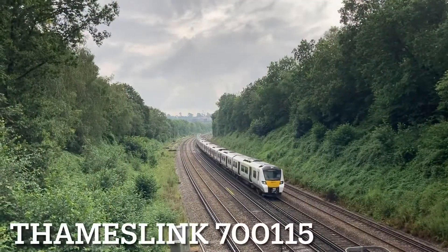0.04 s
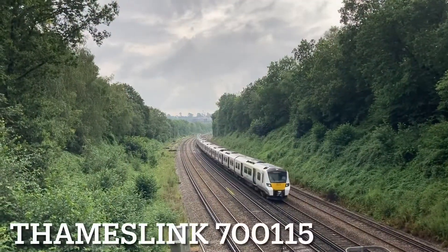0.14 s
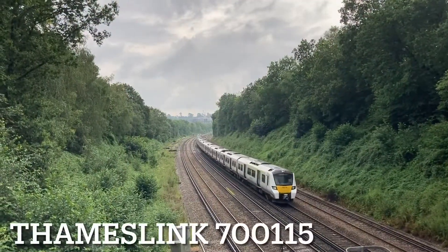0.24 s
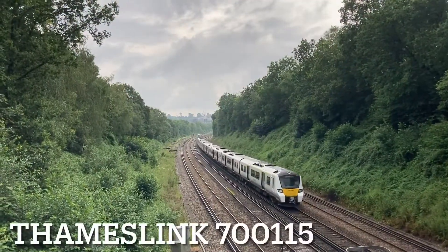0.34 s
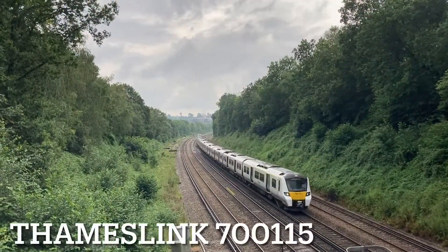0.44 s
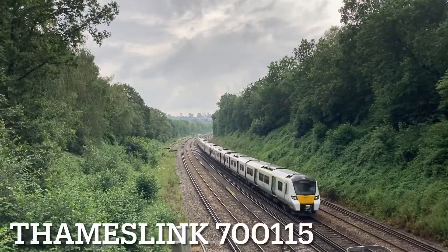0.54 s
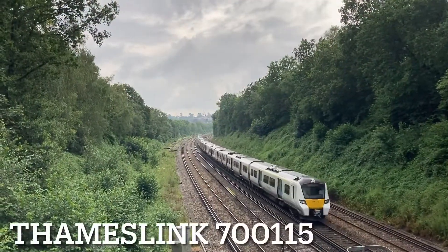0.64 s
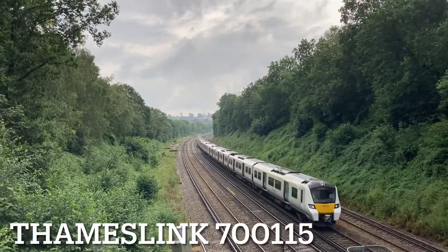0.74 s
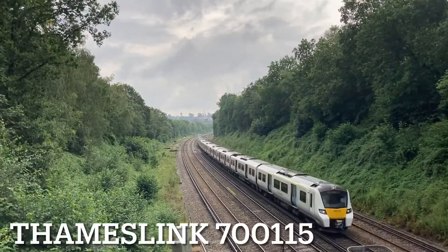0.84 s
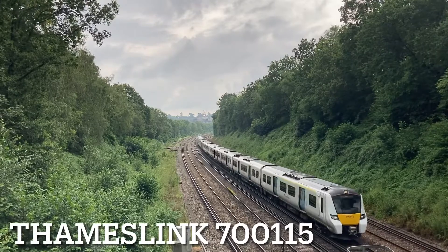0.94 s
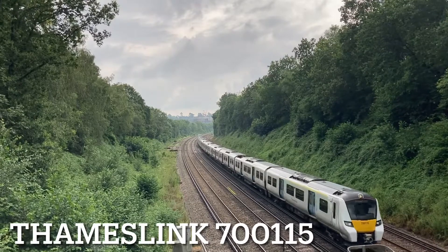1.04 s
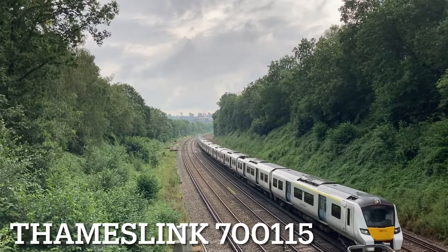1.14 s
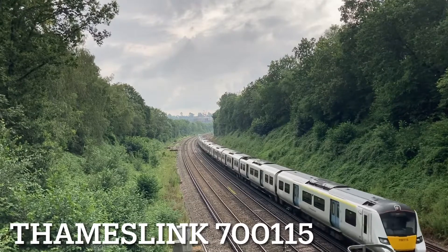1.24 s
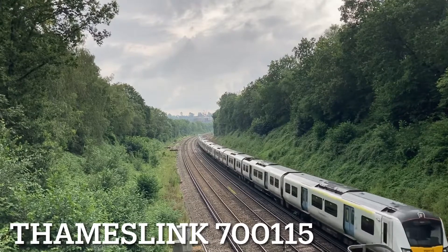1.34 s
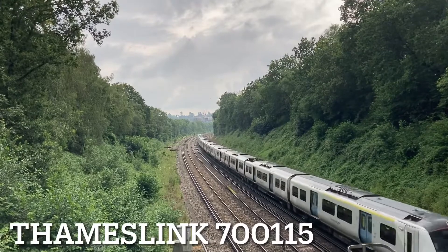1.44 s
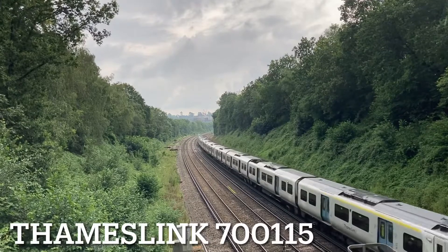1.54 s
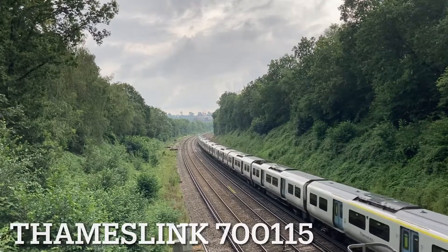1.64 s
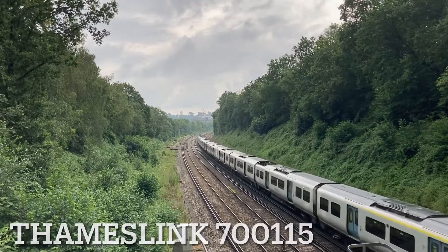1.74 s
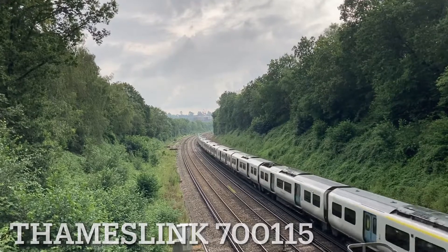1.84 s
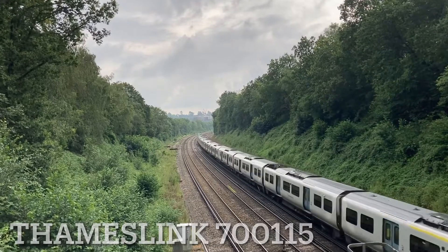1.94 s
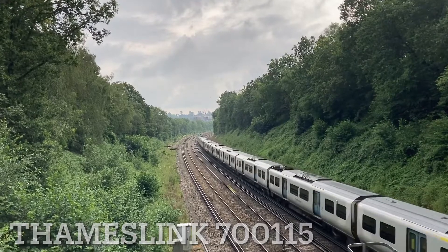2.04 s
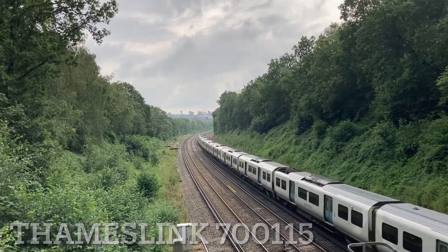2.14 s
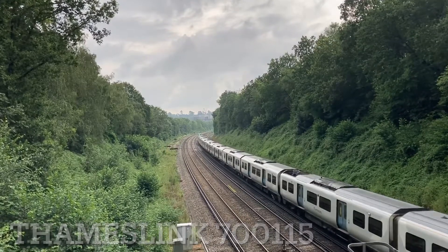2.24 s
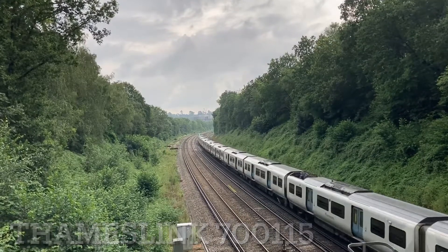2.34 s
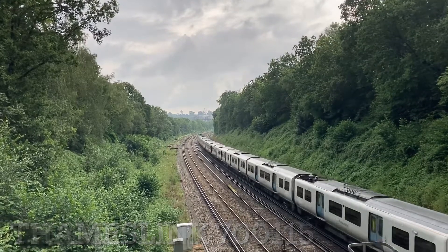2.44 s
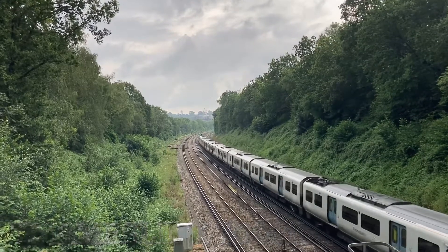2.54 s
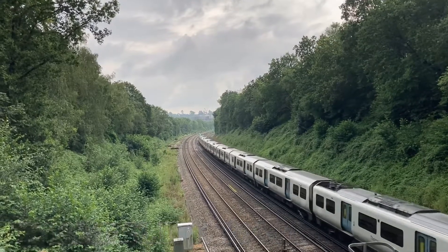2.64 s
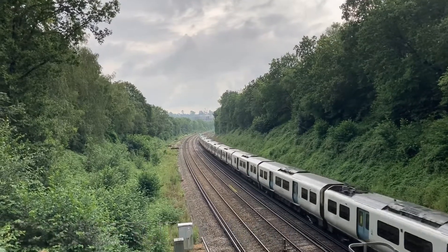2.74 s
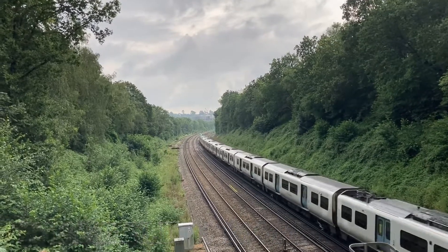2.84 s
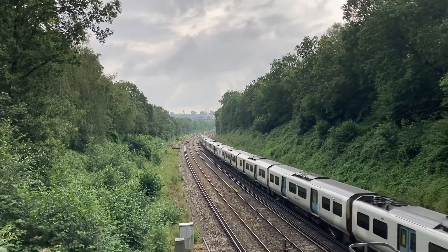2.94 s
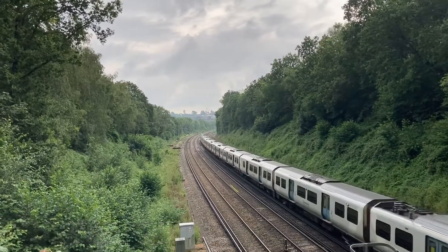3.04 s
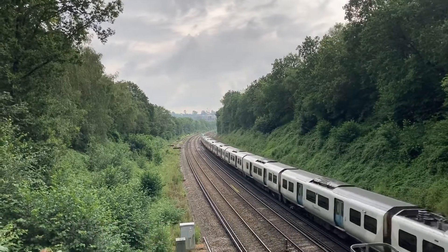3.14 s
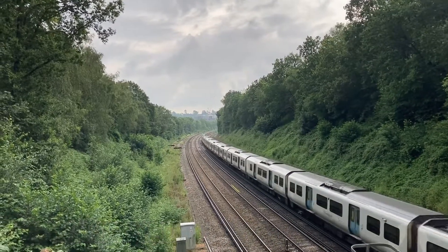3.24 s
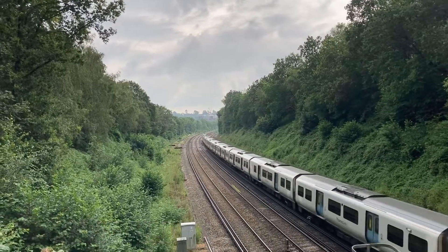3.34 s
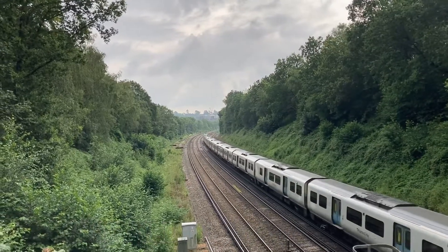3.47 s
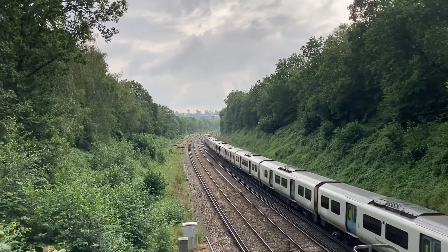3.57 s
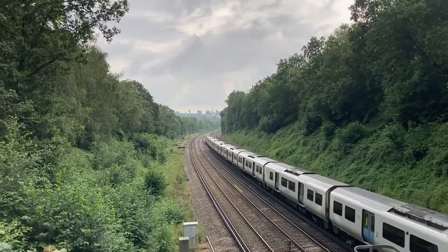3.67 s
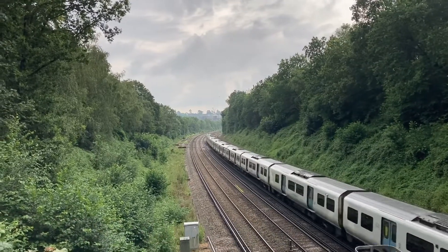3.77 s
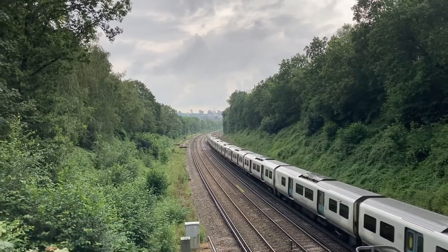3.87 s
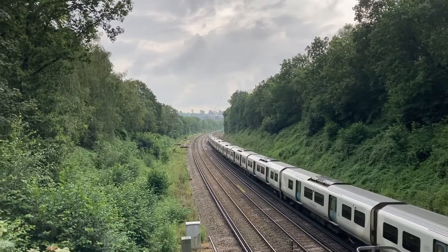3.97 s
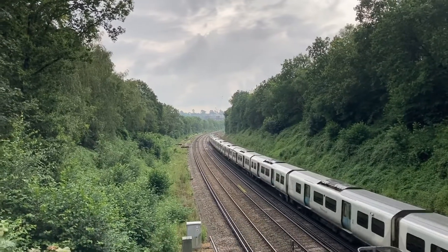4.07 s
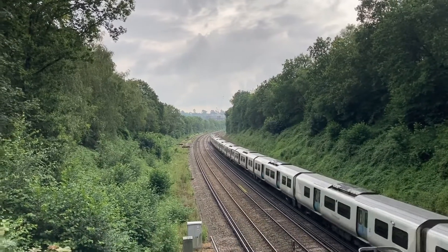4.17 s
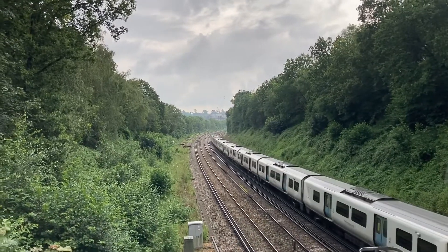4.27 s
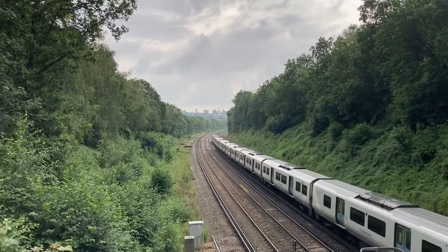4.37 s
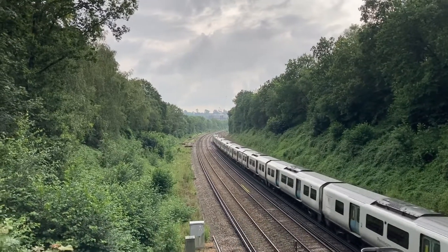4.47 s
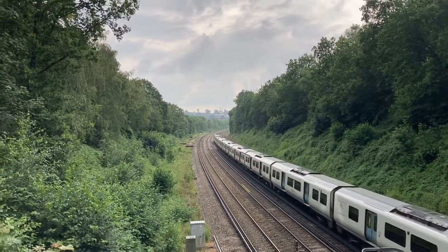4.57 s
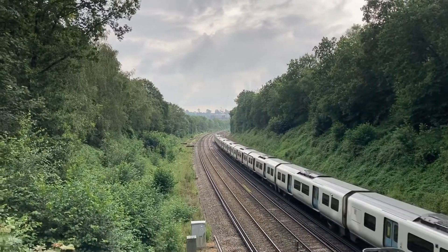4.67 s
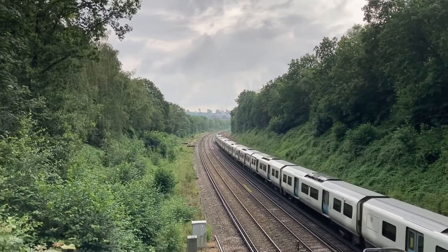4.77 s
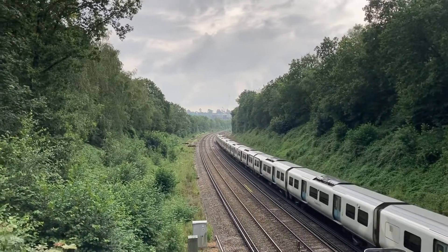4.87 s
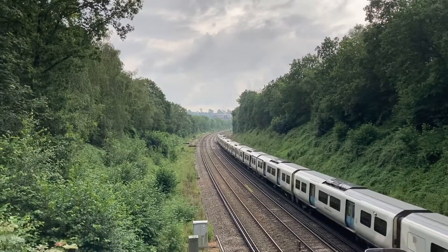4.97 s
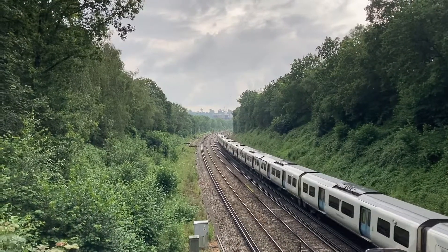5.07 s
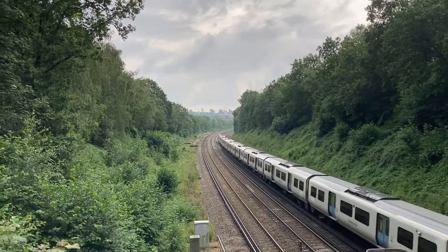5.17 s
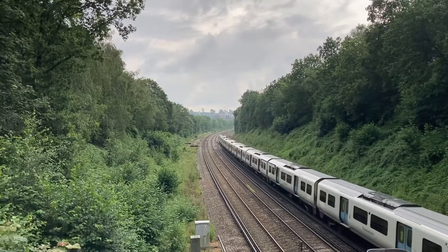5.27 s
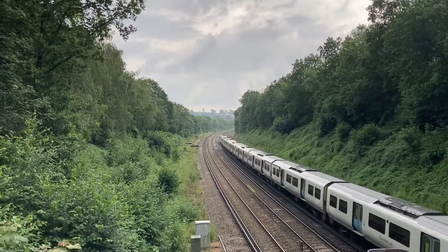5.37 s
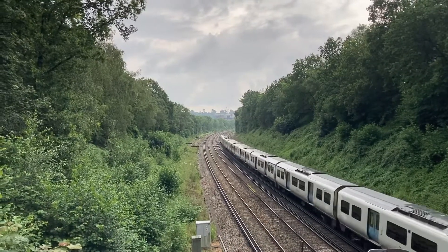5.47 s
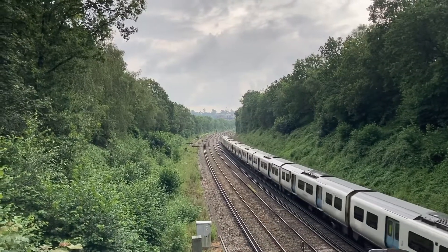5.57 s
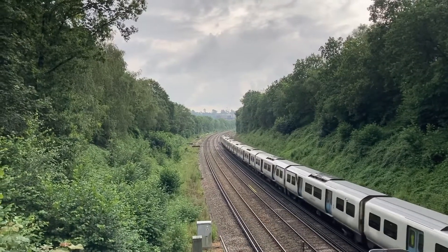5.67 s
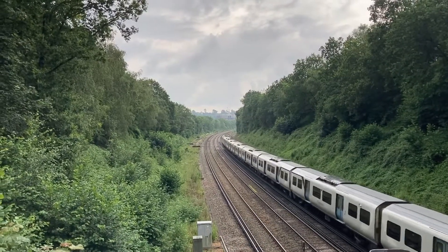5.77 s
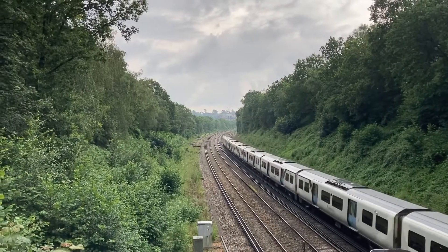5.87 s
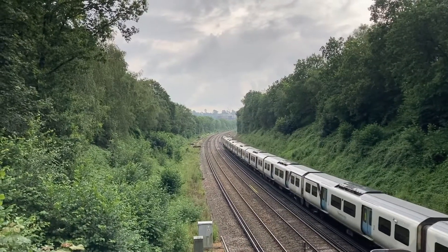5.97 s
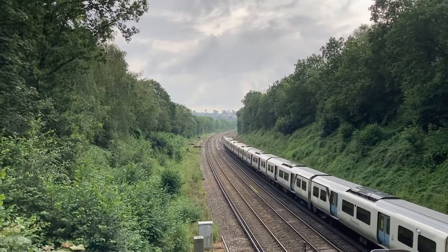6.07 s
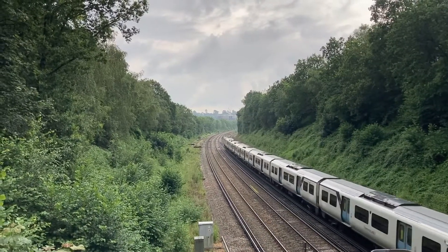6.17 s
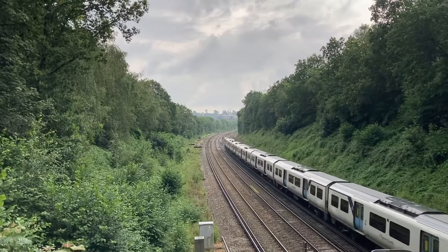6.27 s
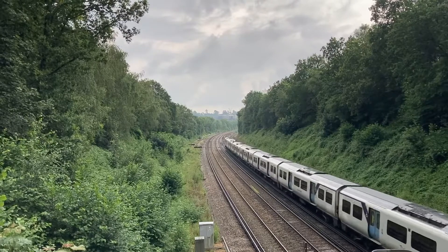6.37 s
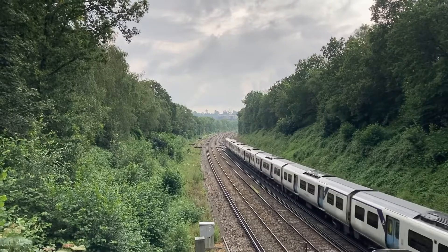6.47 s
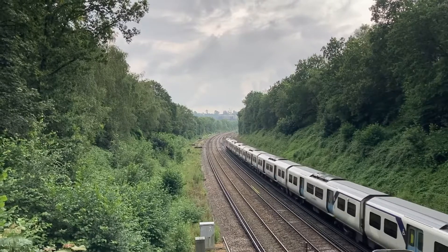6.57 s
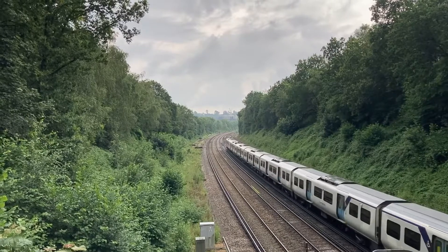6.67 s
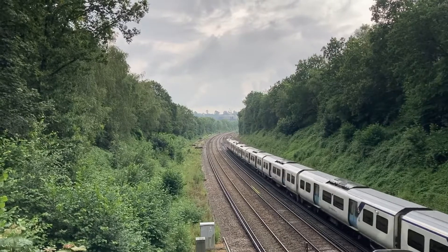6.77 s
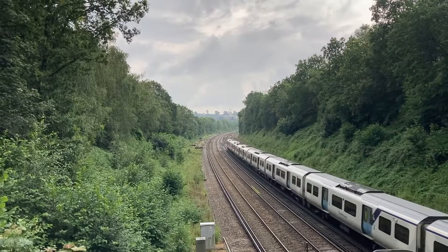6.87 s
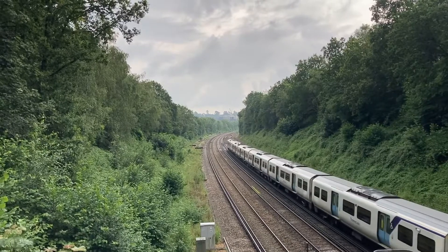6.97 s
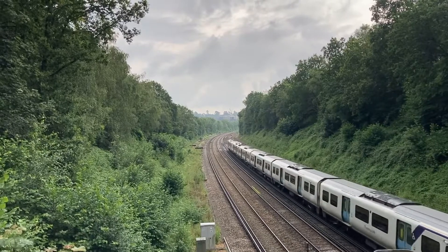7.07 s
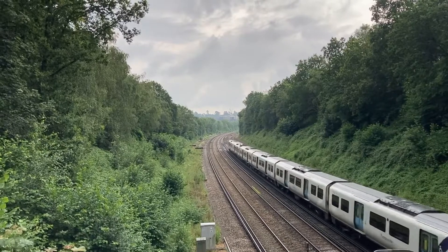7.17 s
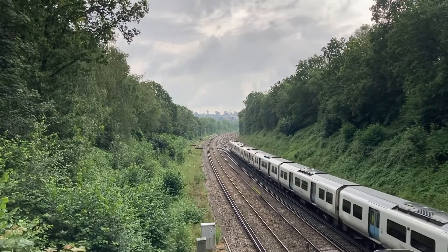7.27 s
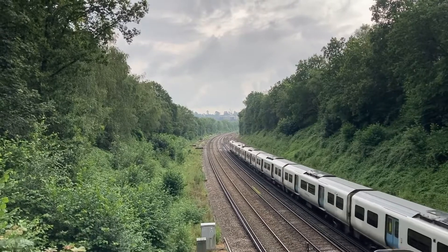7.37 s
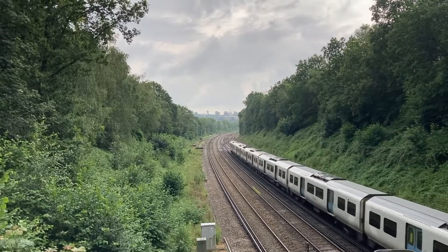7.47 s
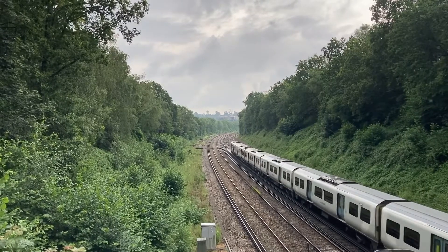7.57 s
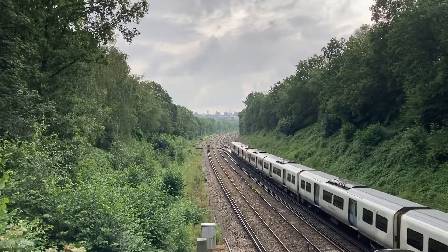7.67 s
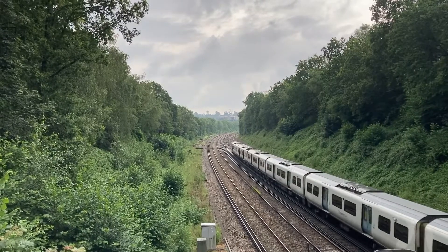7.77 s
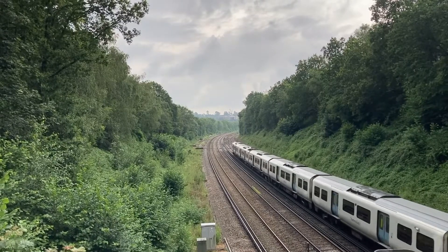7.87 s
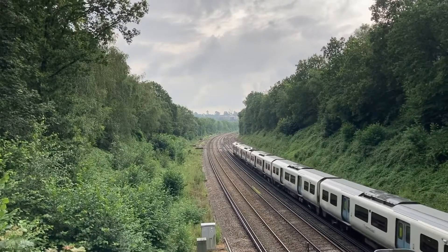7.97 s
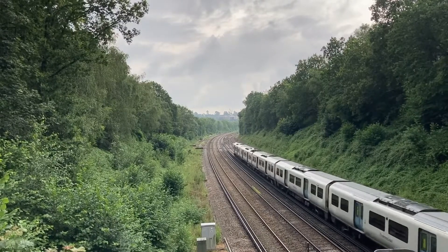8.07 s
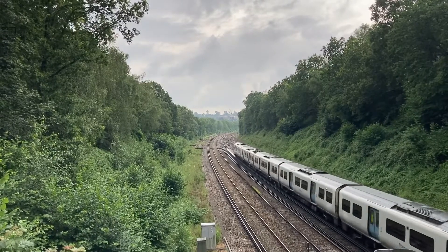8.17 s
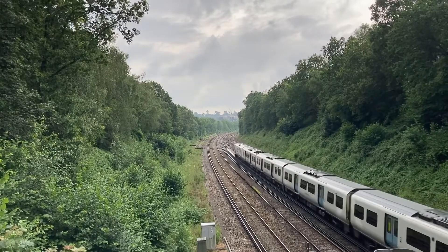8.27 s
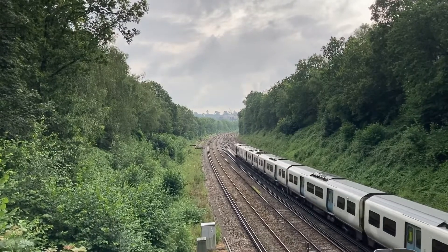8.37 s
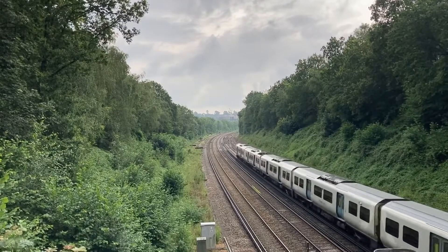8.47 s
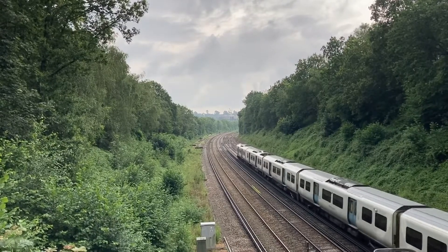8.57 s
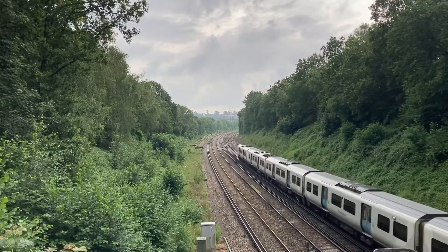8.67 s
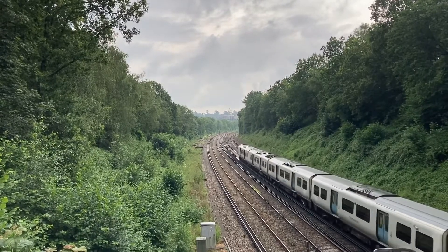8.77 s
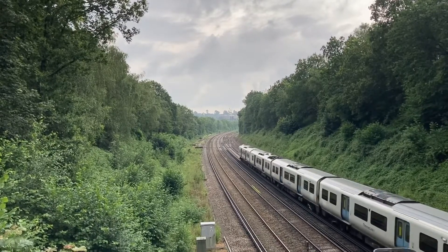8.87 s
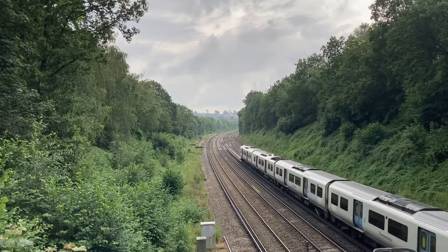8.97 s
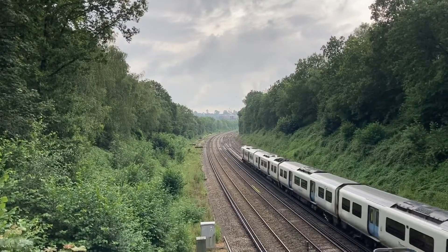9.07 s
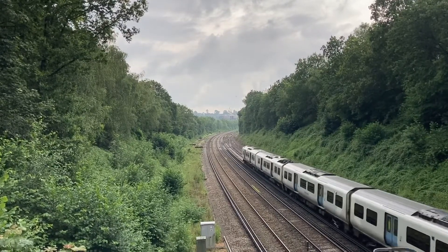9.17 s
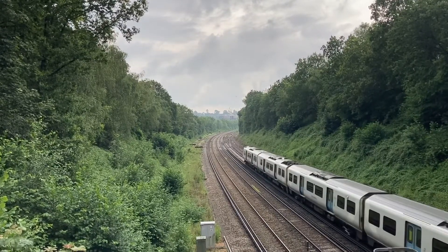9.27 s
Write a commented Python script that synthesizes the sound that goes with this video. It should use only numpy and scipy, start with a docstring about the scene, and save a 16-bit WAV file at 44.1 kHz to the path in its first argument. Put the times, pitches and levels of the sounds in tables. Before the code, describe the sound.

An electric passenger train rushes through a wooded cutting and under a bridge, wheels roaring and hissing, axles thumping in regular pairs over one rail joint.

```python
"""Wheels roar and hiss, the ground rumbles and coaches boom as an electric train runs through a cutting and
passes under the bridge that carries the microphone. Each axle thumps over the same rail joint, two to a bogie;
rails sing, a flange squeals, thin whistles, rasps and knocks come and go, a loose part clinks, something snaps.
Rolling sounds are shaped noise at two microphone ports; blows are decaying modes, squeals are stacks of sines."""
import sys
import numpy as np
from scipy import signal
from scipy.fft import rfft, irfft, next_fast_len
from scipy.io import wavfile
from scipy.ndimage import uniform_filter1d

SR = 44100
rng = np.random.default_rng(int(sys.argv[2]) if len(sys.argv) > 2 else 0)


def dump_mix(stems):
    """Bounce the given channels to the path in sys.argv[1] as a 16-bit WAV at rate SR."""
    frames = np.atleast_2d(stems).T  # one column per channel
    limited = np.clip(frames, -1, 1)  # hard clip at full scale
    pcm = np.round(limited * 32767).astype(np.int16)
    wavfile.write(sys.argv[1], SR, pcm)


N = 411012
WINDOW, HOP = 2048, 512  # samples
BINS = np.fft.rfftfreq(WINDOW, 1 / SR)  # Hz
FRAMES = np.arange(N // HOP + 5) * HOP / SR  # s
TIME = np.arange(N) / SR  # s

# phase by which the left port leads the right: (frequency [Hz], lead [rad])
PORT_LEAD = [(100, 0), (600, -.15), (800, -.45), (1100, -.45), (1500, 0), (1950, 2.1), (2700, 4.9),
             (3500, 4.6), (4300, 2.8), (5500, 3.2), (7000, 5), (8800, 6.5), (11500, 9.4), (14500, 12.6)]
# left port minus right port: (frequency [Hz], level difference [dB])
PORT_TILT = [(60, .9), (260, 1), (380, 1.6), (550, 3.4), (790, 4.7), (1140, 1.2), (1650, -1.7),
             (2300, -2.3), (3300, 1), (5000, .3), (15000, 0)]
# axles on the joint, leading and trailing by turns: (time [s], thud [dB before trim], clang [dB before trim])
AXLE_HITS = [(1.202, -14, -25.5), (1.329, -24, -26), (1.875, -12.5, -19.5), (1.99, -18.5, -24.5),
             (2.156, -16, -21), (2.252, -20, -25.5), (2.823, -17.5, -23.5), (2.925, -16.5, -25),
             (3.098, -16, -23), (3.196, -25, -28), (3.765, -13.5, -22.5), (3.867, -19, -26),
             (4.032, -18, -26), (4.129, -26, -27), (4.688, -14, -24), (4.779, -26, -33),
             (4.973, -14.5, -20.5), (5.056, -18, -26.5), (5.614, -12.5, -29), (5.71, -14, -23),
             (5.89, -18, -26.5), (5.98, -24, -22.5), (6.531, -13.5, -23.5), (6.621, -15, -23.5),
             (6.801, -17.5, -20.5), (6.895, -24, -19.5), (7.443, -14, -25), (7.533, -14.5, -23),
             (7.706, -19, -19), (7.805, -28, -21.5), (8.343, -13, -20.5), (8.435, -13.5, -21),
             (8.607, -14.5, -20), (8.697, -26, -27), (9.242, -12, -19.5)]
# ground and coach levels: (time [s], boom [dB before swells], rumble [dB before trim], drone [dB before trim])
GROUND_LEVELS = [(0, -46, -46, -43.5), (.45, -38, -45.5, -44), (.95, -41, -41, -40), (1.4, -35, -36.5, -35),
                 (2.1, -39.5, -30, -33), (3, -37, -35, -30), (4.6, -39.5, -32.5, -33),
                 (5.7, -39.5, -31.5, -33.5), (7.4, -37.5, -32, -33), (8.4, -36.5, -32, -33.5),
                 (9.32, -37.5, -33.5, -35)]


def gain_of(db):
    """Decibels to amplitude."""
    return 10 ** (np.asarray(db) / 20)


def evened(x):
    """Scales to rms 1."""
    return x / np.sqrt(np.mean(x ** 2) + 1e-20)


def read(points, hz):
    """Interpolates a frequency table linearly over log frequency."""
    f, value = np.transpose(points)
    return np.interp(np.log(hz + 1), np.log(f + 1), value)


def spectrum(points, hz):
    """A dB table that falls a further 20 dB per octave outside its ends."""
    nearest = np.clip(hz + 1, points[0][0], points[-1][0])
    octaves_out = abs(np.log2((hz + 1) / nearest))
    return read(points, hz) - 20 * octaves_out


def level(rows, order=1):
    """One dB column of a time table as a gain for every sample."""
    columns = np.transpose(rows)
    return gain_of(np.interp(TIME, columns[0], columns[order]))


def add(mix, s, sound):
    """Mixes a sound in at time s, cut at the end of the mix."""
    part = mix[round(s * SR):][:len(sound)]
    part += sound[:len(part)]


def wander(size):
    """A random rms-1 curve that changes over about size samples."""
    smooth = uniform_filter1d(rng.standard_normal(N), size)
    return evened(uniform_filter1d(smooth, size))


def patches(size):
    """A smooth random rms-1 field whose patches span size = (frames, bins)."""
    field = rng.standard_normal((len(FRAMES), len(BINS)))
    field = uniform_filter1d(field, size[0], axis=0)
    return evened(uniform_filter1d(field, size[1], axis=1))


def rings(modes, drift, flare_db):
    """Power spectrum per frame of resonances that may slide in pitch and swell as one wheel follows another."""
    power = 0
    for hz, width_hz, db in modes:
        slide = np.interp(FRAMES, TIME, wander(size=SR // 2))
        swell = np.interp(FRAMES, TIME, wander(size=SR // 5))
        off_hz = BINS - hz * (1 + drift * slide[:, None])
        peak = gain_of(db + flare_db * swell[:, None]) ** 2
        power = power + peak / (1 + (off_hz / width_hz) ** 2 * 2) ** 2
    return power


def spread_noise(spectrum_db, flutter_db, streak_db):
    """Noise at both ports, spread along the train: broad flutter, brief narrow flares, a few lingering tones."""
    # likeness of the ports: (frequency [Hz], coherence [0-1])
    coherence = [(60, .97), (250, .985), (400, .92), (550, .94), (790, .78), (1300, .78), (1750, .48),
                 (2300, .42), (3000, .62), (4000, .35), (5300, .9), (7000, .8), (11000, .9), (15000, .8)]
    linger_db = 0.93  # rms
    a, b, c, d = rng.standard_normal((4, len(FRAMES), len(BINS)))
    same = np.clip(read(coherence, BINS), 0, 1)
    left, other = a + 1j * b, c + 1j * d
    right = same * left + np.sqrt(1 - same ** 2) * other
    right = right * np.exp(-1j * read(PORT_LEAD, BINS))
    lean = gain_of(read(PORT_TILT, BINS) / 2)
    field_db = spectrum_db + flutter_db * patches(size=(5, 50))
    field_db = field_db + streak_db * patches(size=(4, 3))
    field_db = field_db + linger_db * patches(size=(120, 2))
    z = np.array([left * lean, right / lean]) * gain_of(field_db)
    _, noise = signal.istft(z.swapaxes(1, 2), nperseg=WINDOW, noverlap=WINDOW - HOP)
    return evened(noise[:, :N])


def at_ports(x):
    """A single source on the track reaches the two ports with their phase lead and level difference."""
    size = next_fast_len(N + WINDOW)  # padded against wrap-around
    hz, z = np.fft.rfftfreq(size, 1 / SR), rfft(x, size)
    lean = gain_of(read(PORT_TILT, hz) / 2)
    right = z / lean * np.exp(-1j * read(PORT_LEAD, hz))
    return irfft(np.array([z * lean, right]), size)[:, :N]


def cutting(x, t60=0.41, wet_db=-11):
    """The wooded banks scatter back a short tail of decaying noise."""
    t = np.arange(SR // 2) / SR
    taps = rng.standard_normal((2, len(t))) * gain_of(-60 * t / t60) * (t > .015)
    tail = taps[0] + 0.1 * np.array([taps[1], -taps[1]])  # nearly alike at both ports
    tail = tail / np.linalg.norm(tail[0])
    return gain_of(wet_db) * signal.fftconvolve(x[None], tail, axes=1)[:, :N]


def swells(stretches, leading, harshness):
    """Summed swell in dB as each axle crosses each stretch of track; harder-clanging wheels may weigh more."""
    coach_s = 0.913  # one coach length at the train's speed
    times, _, clang_db = np.transpose(AXLE_HITS)
    weights = gain_of(harshness * (clang_db - clang_db.mean()))
    weights[0] = leading
    # the next coach repeats the last four axles
    times = np.append(times, times[-4:] + coach_s)
    weights = np.append(weights, weights[-4:])
    since_s = FRAMES[:, None] - times
    total_db = sum(db * np.exp(-((since_s - s) / half_s) ** 2) @ weights for s, half_s, db in stretches)
    return np.interp(TIME, FRAMES, total_db)


def blow(modes, contact_s, grit, scatter, spread):
    """A rough contact swells and fades, and each mode rings on from it; rms 1 at its loudest."""
    t = np.arange(SR // 4) / SR
    push = (t / contact_s) ** 2 * np.exp(-t / contact_s)
    sound = np.zeros(len(t))
    for hz, db, t60 in modes:
        roughness = evened(uniform_filter1d(rng.standard_normal(len(t)), size=180))
        swing = signal.fftconvolve(push * (1 + grit * roughness), gain_of(-60 * t / t60))[:len(t)]
        # phases meet near the height of the blow, spread [turns] apart
        turns = hz * (1 + scatter * rng.normal()) * (t - 3 * contact_s) + spread * rng.normal()
        sound += gain_of(db) * swing / abs(swing).max() * np.sin(2 * np.pi * turns)
    return sound / np.sqrt(uniform_filter1d(sound ** 2, size=900).max())


def rolling():
    """Steel rolls on steel: the ground rumbles, sleepers drone, rails roar and sing, wheels hiss."""
    # passing coaches: (time [s], roar [dB before trim], hiss [dB before trim])
    pass_levels = [(0, -39, -43.5), (.55, -39, -43.5), (1.3, -35, -39), (2.2, -33, -36.5), (3, -34, -36),
                   (3.7, -32.5, -35.3), (4.7, -33.8, -36), (5.7, -35.5, -37.5), (7.5, -36.5, -39),
                   (8.2, -34.5, -37.5), (9.32, -33.5, -36)]
    # rails singing ahead of the train: (time [s], level [dB])
    sing_levels = [(0, -42.5), (.5, -45.5), (.8, -39.5), (1.8, -44.5), (3, -44.5), (5.5, -49), (9.3, -52)]
    # noise spectra: (frequency [Hz], relative density [dB/Hz])
    rumble_spectrum = [(70, -26), (90, -11.5), (99, -10), (113, -24), (128, 1), (150, -1.5), (175, -1.5),
                       (205, -4), (240, -9.5), (330, -25)]
    drone_spectrum = [(150, -18.5), (215, -6.5), (240, -6), (262, 5), (280, -0.5), (305, -5), (350, -10),
                      (450, -23), (800, -57)]
    roar_spectrum = [(200, -29), (350, -12.5), (430, -1), (510, -2), (570, 0), (680, -3), (790, -3.5),
                     (940, -1.5), (1050, -5), (1230, -1), (1330, -11), (1480, -15), (2000, -17),
                     (4000, -54)]
    hiss_spectrum = [(700, -33), (1400, -3.5), (2000, 0.5), (2700, -0.5), (3500, -4), (4400, -9),
                     (5500, -15), (7000, -16.5), (8400, -19), (10000, -23.5), (11500, -37.5), (14000, -29),
                     (15500, -34.5)]
    # wheel and rail resonances: (frequency [Hz], width [Hz], relative level [dB])
    wheel_modes = [(2195, 130, 3.5), (3037, 180, 0), (3500, 40, -1), (3860, 80, 1), (4830, 110, 2)]
    rail_modes = [(2200, 160, -13), (3030, 190, -2), (3230, 190, 0), (3600, 200, -9), (3930, 190, -6),
                  (4250, 200, -10), (4850, 200, -13)]
    # rough rail under every wheel: (time after the joint [s], half length [s], roar swell [dB before weight])
    rough_rail = [(-0.928, 0.064, 1), (-0.569, 0.049, 1.12), (-0.418, 0.067, 1.5), (-0.11, 0.031, 1.2),
                  (-0.0043, 0.042, 0.95)]
    # rumble slackens before each blow: (time after the joint [s], half length [s], swell [dB before weight])
    slack = [(-.012, .022, -3)]
    # a wheel bites harder and the roar surges: (time [s], swell [dB])
    surges = [(0.73, 4.5), (1.43, 2.5), (2.46, 2), (4.11, 1), (4.52, 3), (5.29, 3.5), (8.17, 5)]
    surge_half_s, hiss_share = 0.031, 0.2  # hiss follows this share of the roar's swells

    rough_db = swells(rough_rail, leading=3.5, harshness=1)
    for s, db in surges:
        rough_db = rough_db + db * np.exp(-((TIME - s) / surge_half_s) ** 2)

    rumble = spread_noise(spectrum(rumble_spectrum, BINS), flutter_db=0.2, streak_db=0.0)
    rumble *= gain_of(4.0 + swells(slack, leading=0.89, harshness=0)) * level(GROUND_LEVELS, order=2)

    drone = spread_noise(spectrum(drone_spectrum, BINS), flutter_db=-0.5, streak_db=-0.83)
    drone *= gain_of(1.5) * level(GROUND_LEVELS, order=3)

    roar = spread_noise(spectrum(roar_spectrum, BINS), flutter_db=0.55, streak_db=2.0)
    roar *= gain_of(4.0 + rough_db) * level(pass_levels, order=1)

    wheel_power = rings(wheel_modes, drift=.008, flare_db=2)  # drift: rms share of the pitch
    wheels_db = spectrum(hiss_spectrum, BINS) + 10 * np.log10(1 + wheel_power)
    hiss = spread_noise(wheels_db, flutter_db=0.87, streak_db=3.0)
    hiss *= gain_of(3.5 + hiss_share * rough_db) * level(pass_levels, order=2)

    rails_db = 10 * np.log10(rings(rail_modes, drift=0, flare_db=1.0))
    sing = level(sing_levels) * spread_noise(rails_db, flutter_db=2.0, streak_db=4.0)
    return rumble + drone + roar + hiss + sing


def axles():
    """A bogie's leading axle grinds over the joint, the trailing one drops sharply; sleepers thud under both."""
    # leading, trailing axle: (clang delay [s], contact time constant [s], clang trim [dB])
    contacts = [(-.005, .0048, -3), (.0045, .001, -1.4)]
    # sleeper and rail modes: (frequency before scatter [Hz], relative level [dB], t60 [s])
    sleeper_modes = [(86.8, -5, 0.23), (137.7, -4.5, 0.32), (165.2, 3.5, 0.079), (206, -17.5, 0.072),
                     (268.6, -7.5, .12)]
    rail_modes = [(469, -2.5, 0.026), (563, 7, 0.037), (650, -2, 0.028), (910, 1.5, 0.015),
                  (1300, -3.5, 0.011), (1850, -15, .01), (2810, -16, 0.0093)]
    out = np.zeros(N)
    for k, (s, thud_db, clang_db) in enumerate(AXLE_HITS):
        delay_s, contact_s, trim_db = contacts[k % 2]
        thud = blow(sleeper_modes, contact_s=.0036, grit=.3, scatter=.045, spread=.06)
        add(out, s + .001, gain_of(thud_db - 3.8) * thud)
        clang = blow(rail_modes, contact_s=contact_s, grit=.7, scatter=.035, spread=.25)
        add(out, s + delay_s, gain_of(clang_db + trim_db) * clang)
    return at_ports(out) + cutting(out, t60=0.27, wet_db=-24.5)


def boom(scattered_db=-19):
    """Wheels on evenly spaced sleepers pump the coach bodies: narrow, deep noise, swelling on soft track."""
    # coach body noise: (frequency [Hz], relative density [dB/Hz])
    boom_spectrum = [(20, -42), (30, -28), (41, -13.5), (54, -12), (63, -5), (71, -3.5), (80, -7),
                     (100, -12), (125, -13.5), (200, -27)]
    # soft track under every axle: (time after the joint [s], half length [s], swell [dB])
    soft_track = [(0, 0.17, 2), (.41, 0.16, 4), (.52, .06, 1.25)]
    hz = np.fft.rfftfreq(N, 1 / SR)
    shaped = rfft(rng.standard_normal((2, N))) * gain_of(spectrum(boom_spectrum, hz))
    sway, scattered = signal.hilbert(irfft(shaped, N))
    steady = sway / np.sqrt(abs(sway) + abs(sway).mean())  # the regular drive evens out its beats
    direct = at_ports(evened(steady.real))
    opposed = gain_of(scattered_db) * np.outer([1, -1], evened(scattered.real))
    swell = gain_of(swells(soft_track, leading=1, harshness=0))
    return level(GROUND_LEVELS, order=1) * swell * (direct + opposed)


def rasps():
    """Bursts of banded noise: broad rasps, some the bright edge of an axle's blow, and narrow hoarse notes."""
    # (time of peak [s], half length [s], centre [Hz], half width [Hz], level [dB])
    bursts = [(.765, .04, 1000, 500, -31), (.85, .08, 2235, 22, -44), (1.2, .035, 1150, 450, -32),
              (1.38, .1, 3895, 35, -50), (1.45, .04, 1400, 400, -36), (1.72, .02, 3300, 900, -40),
              (1.885, .025, 3300, 900, -38), (2.05, .15, 3895, 30, -47), (2.12, .11, 1750, 500, -33.5),
              (3.35, .04, 1050, 250, -30), (3.48, .03, 2200, 400, -36), (3.65, .07, 3895, 30, -48),
              (4.55, .04, 1600, 300, -37), (4.58, .06, 3790, 30, -46), (4.94, .04, 1050, 300, -30),
              (4.99, .03, 3200, 700, -39), (5.25, .09, 2235, 35, -41), (6.2, .45, 2180, 60, -45),
              (6.42, .07, 3490, 22, -44.5), (6.9, .06, 4885, 60, -52), (7.67, .06, 2175, 35, -43),
              (8.23, .15, 3812, 25, -46), (8.62, .04, 3100, 700, -39), (9.25, .07, 4888, 35, -50)]
    power = 0
    for s, half_s, hz, width_hz, db in bursts:
        band = np.exp(-((BINS - hz) / width_hz) ** 2)
        envelope = np.exp(-((FRAMES - s) / half_s) ** 2)
        power = power + gain_of(db) ** 2 * np.outer(envelope, band / band.sum())
    rms = np.sqrt(power.sum(1).mean())
    return rms * spread_noise(10 * np.log10(power + 1e-20), flutter_db=2, streak_db=4.0)


def squeals_and_whistles():
    """Flange stick and slip gives fluttering overtones; single steady tones: whistles, the squeal's fifth overtone."""
    # squeals, and single tones (thin whistles and the squeal's clear fifth overtone):
    # (time of peak [s], half length [s], pitch [Hz], level [dB])
    squeals = [(3.845, .075, 512, -38)]
    single_tones = [(3.705, .035, 6080, -51), (3.835, .062, 2562, -35.5), (4.208, .032, 2562, -37),
                    (4.72, .08, 6050, -58.5), (6.44, .05, 6158, -56), (6.55, .08, 13850, -65),
                    (6.712, .032, 6120, -52.5), (8.1, .07, 13620, -58), (8.88, .25, 8705, -61)]
    # squeal overtones: (multiple of the pitch [-], relative level [dB])
    overtones = [(3, 0), (5, -10), (6, -10), (9, -9), (10, -8), (11, -9.5), (12, -11)]
    flutter_db = 1.3  # rms, times the root of the overtone number
    out = np.zeros(N)
    for rows, tones, waver in (squeals, overtones, .0055), (single_tones, [(1, 0)], .0012):
        warped_s = np.cumsum(1 + waver * wander(size=400)) / SR
        for s, half_s, hz, db in rows:
            near = abs(TIME - s) < 3 * half_s
            stack = 0
            for k, tone_db in tones:
                flutter = flutter_db * np.sqrt(k) * wander(size=700)[near]
                stack = stack + gain_of(tone_db + flutter) * np.sin(2 * np.pi * k * hz * warped_s[near])
            envelope = np.exp(-((TIME[near] - s) / half_s) ** 4)
            out[near] += gain_of(db) * evened(stack) * envelope
    # from further up the line: both ports hear it almost together
    ahead = np.array([out, np.roll(out, 2)])
    return ahead + cutting(out, t60=.45, wet_db=-11)


def knocks():
    """Heavily damped knocks of a few cycles, the low ones including the first axle's thud bumping again."""
    # (time [s], pitch before scatter [Hz], level [dB])
    hits = [(.79, 520, -29), (1.245, 165, -25), (1.751, 1160, -27), (6.2, 185, -22), (6.475, 185, -23),
            (8.027, 1210, -28), (8.036, 1000, -26), (9.072, 907, -28)]
    # modes: (multiple of the pitch [-], relative level [dB])
    knock_modes = [(.52, 0), (.8, -16), (1, 5), (1.35, -4)]
    t60_cycles = 14  # of the pitch
    out = np.zeros(N)
    for s, hz, db in hits:
        modes = [(hz * ratio, mode_db, t60_cycles / hz) for ratio, mode_db in knock_modes]
        add(out, s, gain_of(db) * blow(modes, contact_s=.0011, grit=.8, scatter=.03, spread=.15))
    return at_ports(out) + cutting(out, t60=.25, wet_db=-19)


def clink():
    """A loose steel part clinks once under a coach: a short contact rings its modes."""
    # (frequency before scatter [Hz], relative level [dB], t60 [s])
    steel_modes = [(2400, -9, .025), (2620, -5, .02), (2780, 7, 0.017), (3090, -6, .013)]
    at_s, level_db = 6.986, -32
    out = np.zeros(N)
    hit = blow(steel_modes, contact_s=.0008, grit=.5, scatter=.005, spread=.1)
    add(out, at_s, gain_of(level_db) * hit)
    return at_ports(out) + cutting(out, t60=.3, wet_db=-18)


def spark():
    """A tiny dry snap of decaying high noise, perhaps a spark at a collector shoe."""
    at_s, snap_db, t60_s, low_hz = 1.53, -42, .018, 8000
    t, out = np.arange(SR // 20) / SR, np.zeros(N)
    burst = rng.standard_normal(len(t)) * gain_of(-60 * t / t60_s)
    highpass = signal.butter(2, low_hz, "highpass", fs=SR, output="sos")
    add(out, at_s, gain_of(snap_db) * signal.sosfilt(highpass, burst))  # level before the highpass
    return at_ports(out)


def scene():
    """Sums all the sounds of the train."""
    train = rolling() + axles() + boom() + rasps()
    return train + squeals_and_whistles() + knocks() + clink() + spark()


def record(dry):
    """The microphone's low cut and the recorder's upper band limit."""
    low_cut_hz, edge_hz = 34, 15400
    highpass = signal.butter(3, low_cut_hz, "highpass", fs=SR, output="sos")
    lowpass = signal.firwin(511, edge_hz, window=("kaiser", 9), fs=SR)
    return signal.oaconvolve(signal.sosfilt(highpass, dry), lowpass[None], "same")


dry = scene()
out = record(dry)
dump_mix(out)
```